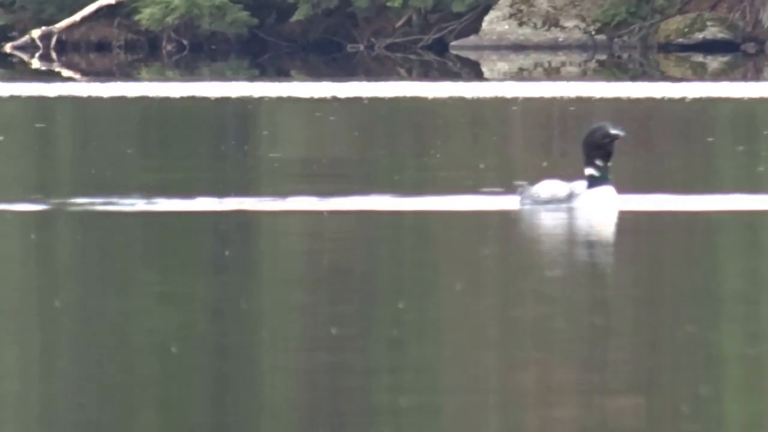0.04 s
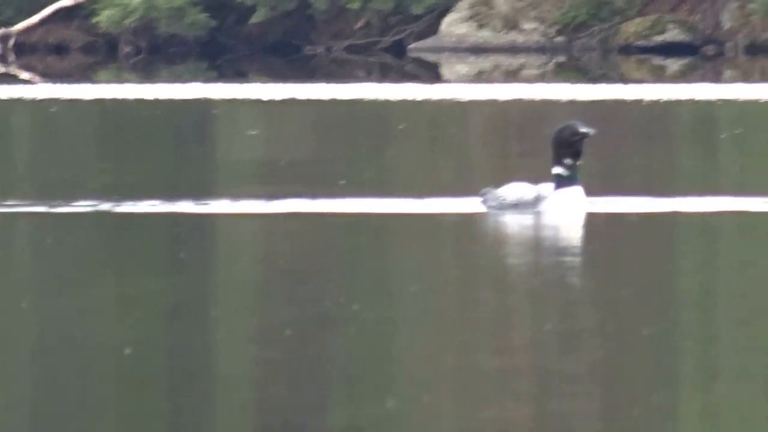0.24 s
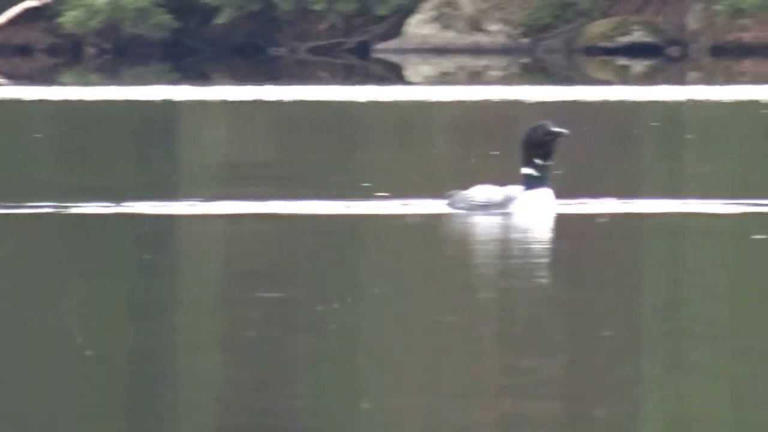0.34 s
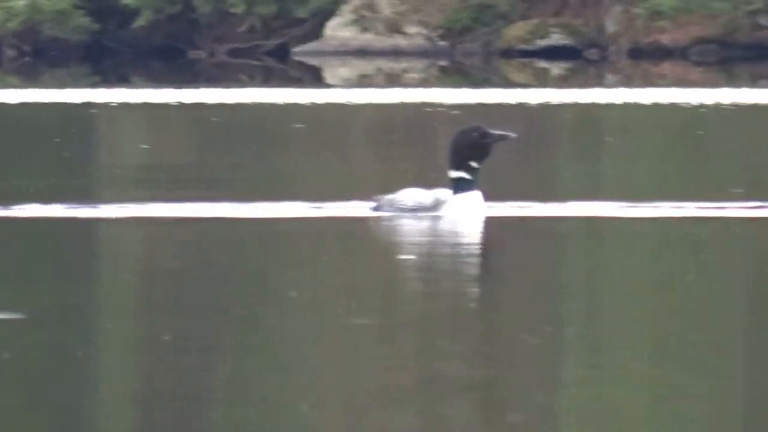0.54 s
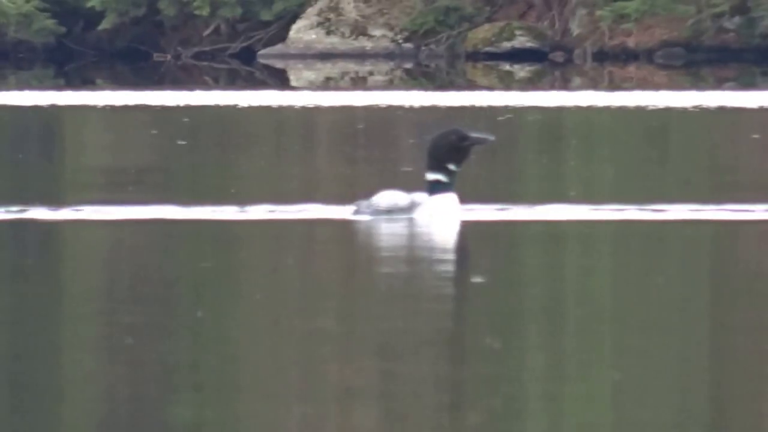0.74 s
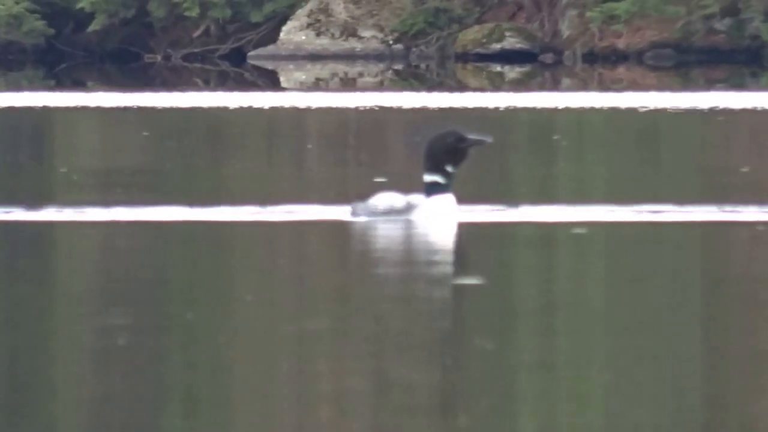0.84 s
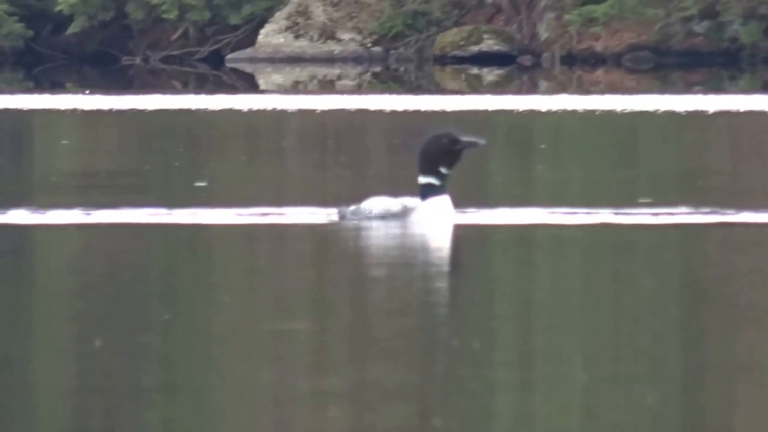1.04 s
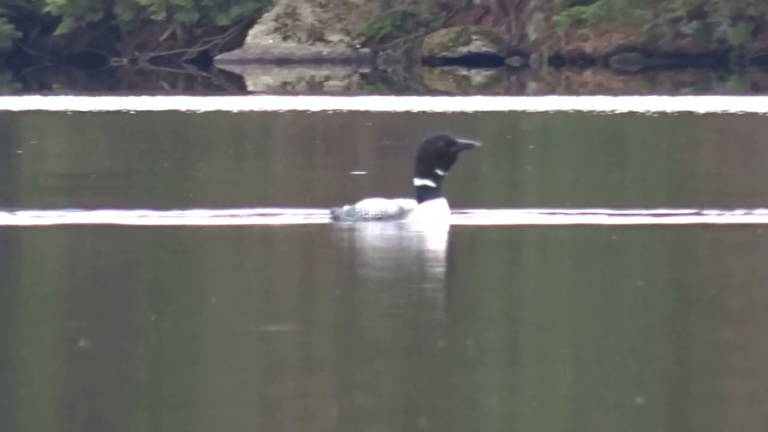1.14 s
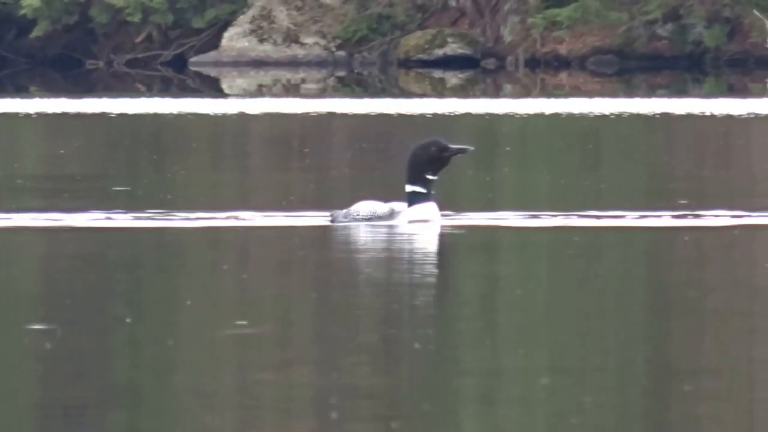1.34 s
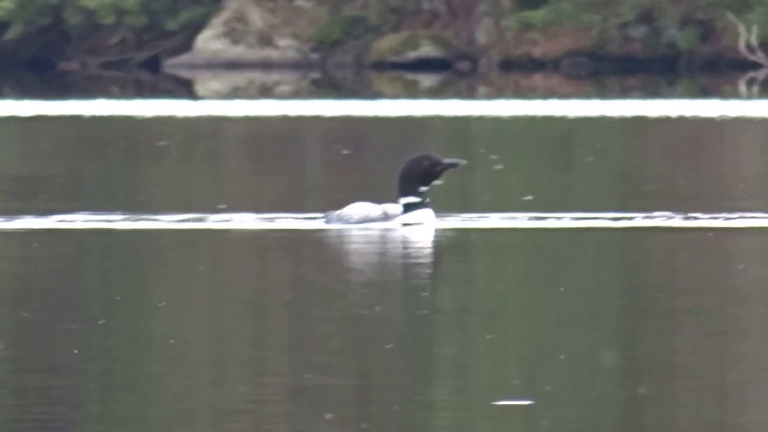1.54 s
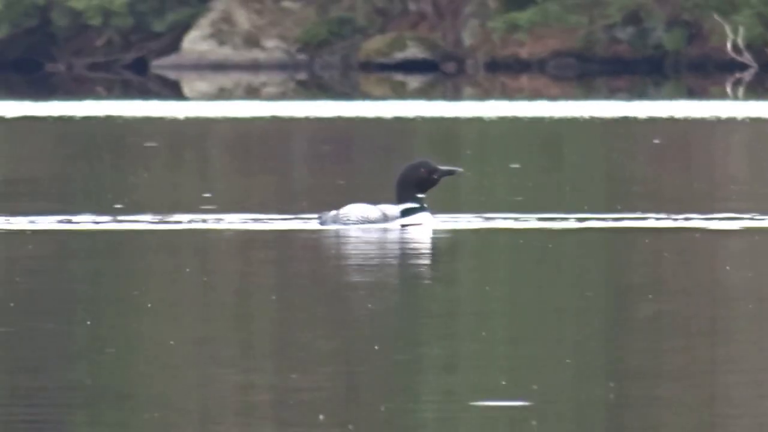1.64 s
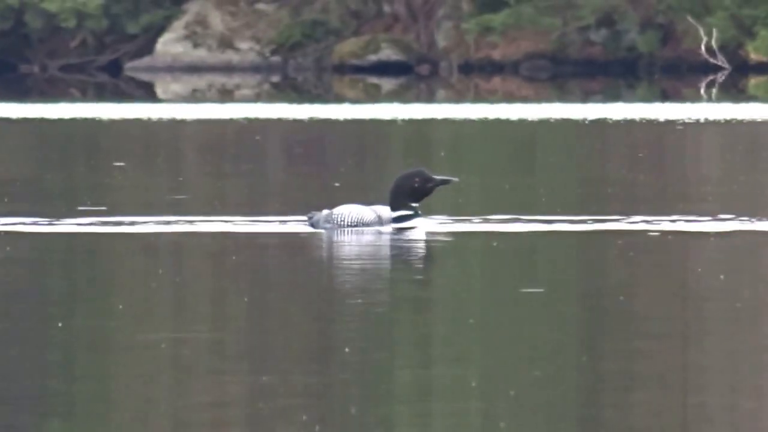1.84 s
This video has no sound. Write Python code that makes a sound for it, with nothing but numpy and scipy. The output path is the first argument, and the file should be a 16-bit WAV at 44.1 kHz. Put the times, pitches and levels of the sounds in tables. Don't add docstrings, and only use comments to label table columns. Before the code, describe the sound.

A loon gives one clear flute-like wail: soft rising lead-in, low note, sudden break to a long arched high note, tiny hiccup. Faint shore echoes follow over quiet lake air, heard through an outdoor microphone with slight hiss.

```python
import sys
import numpy as np
from scipy import signal
from scipy.io import wavfile
from scipy.ndimage import uniform_filter1d

SR = 44100
rng = np.random.default_rng(int(sys.argv[2]) if len(sys.argv) > 2 else 0)


def unload_audio(sound):
    columns = np.transpose(np.atleast_2d(sound))
    steps = np.round(np.clip(columns, -1, 1) * 32767)
    wavfile.write(sys.argv[1], SR, steps.astype(np.int16))


def attenuation_scalar(level_db):
    decades = np.asarray(level_db, float) / 20
    return 10 ** decades


N = 83790

# (t/s, f/Hz, level/dB, bill opening/dB)
LEAD_IN = [
    (0, 337, -50, 9),
    (.056, 366, -42, 4.5),
    (.12, 387.6, -36.5, -2.5),
    (.134, 410, -37, -6.5),
    (.146, 440, -42, 2.5),
    (.183, 529, -57.5, 16.5),
    (.19, 510, -84, 14.5),
]
# (multiple, level/dB, share of bill opening, slope/dB per percent of pitch against the top)
LEAD_IN_MULTIPLES = [(1, -20.5, 1.3, 0.01), (2, 2, 0.034, 0.0), (3, -39.5, 0.94, -0.52)]
# (t/s, f/Hz, level/dB, bill opening/dB)
LOW_NOTE = [
    (.186, 671, -56.5, -4.5),
    (.198, 666.4, -32.5, -5),
    (.24, 676, -30.5, -1.5),
    (.3, 687, -28, -7.5),
    (.36, 695, -25.5, -10),
    (.42, 708.8, -24.5, -8.5),
    (.437, 734, -22.5, -8.5),
    (.446, 743, -25, -17.5),
    (.450, 729.5, -61, -10),
]
# (multiple, level/dB, share of bill opening, slope/dB per percent)
LOW_NOTE_MULTIPLES = [(1, 1, 0.058, 0.003), (2, -24, .1, 0.17), (3, -41, .1, 1.1), (4, -41, 1.3, -1.2),
                      (5, -35.5, 0.49, 1.8)]
# (t/s, f/Hz, level/dB, bill opening/dB)
HIGH_NOTE = [
    (.444, 847, -55, -18),
    (.450, 867, -25.5, -8.5),
    (.54, 876, -24.5, -0.5),
    (.7, 885.9, -24, 1),
    (.82, 895, -23, -2),
    (.97, 892, -23, -4),
    (1.3, 859, -25, -4.5),
    (1.565, 817.6, -30.5, -15),
    (1.586, 800, -55.5, -16.5),
]
# (multiple, level/dB, share of bill opening, slope/dB per percent)
HIGH_NOTE_MULTIPLES = [(1, 1, 0.0, 0.0), (2, -28.5, 0.41, 0.27), (3, -33, 0.32, -0.85),
                       (4, -31.5, 1.7, -0.87), (5, -52, .1, 2), (6, -61, 0.44, 2.5), (7, -56, 0, 1.5),
                       (8, -48.5, 0.37, 3), (11, -55, 0, 1)]
# (t/s, f/Hz, level/dB, bill opening/dB)
HICCUP = [
    (1.575, 647, -76, 0),
    (1.59, 640, -44, 0),
    (1.6, 580, -46.5, 0),
    (1.617, 603, -71, 0),
]
# (multiple, level/dB, share of bill opening, slope/dB per percent)
PLAIN_TONE = [(1, 0.0032, 0.0, 0.013)]
# (delay t/s, spread/s, level/dB)
SHORE_CLUSTERS = [
    (.05, 0.043, -23.5),
    (.24, 0.11, -17.5),
    (.4, 0.03, -25),
    (.75, 0.33, -28.5),
    (1.372, .1, -27),
]
# (f/Hz, level/dB per Hz)
AIR_SPECTRUM = [(28, -17), (50, -10), (130, -6), (300, -7.5), (600, -15.5), (1000, -15), (1900, -24.5),
                (4000, -37.5)]
# (f/Hz, likeness)
AIR_LIKENESS = [(40, 0.9), (125, 1), (300, .86), (1000, 0.58), (3000, 0.74)]
# (t/s, f/Hz, level/dB, bill opening/dB, unused here)
DROPLET = [
    (.413, 7380, -83.5, 0),
    (.419, 6830, -71, 0),
    (.422, 6360, -68, 0),
    (.425, 6050, -64.5, 0),
    (.428, 5900, -88.5, 0),
]
# (t/s, peak level/dB, f/Hz, time to fall 60 dB/s)
TICK_RINGS = [
    (.5046, -41, 10800, .003),
    (.5046, -42, 14000, .0012),
    (1.6806, -51, 10300, .0025),
    (1.6806, -49, 13000, .0022),
    (1.195, -60, 13000, .004),
]
# (t/s, level/dB, length/s, f/Hz)
WIND_PUFFS = [
    (.8, -52.5, 0.017, 51.3),
    (.93, -52.5, 0.021, 44.8),
    (1.125, -45, 0.015, 60),
    (1.24, -36, 0.01, 64.2),
    (1.36, -54, 0.058, 62.3),
    (1.875, -49.5, 0.0088, 88.9),
]

TIME = np.arange(N) / SR
SIDES = np.array([[.5], [-.5]])


def at_hz(points, hz):
    table_hz, values = np.transpose(points)
    return np.interp(np.log(hz), np.log(table_hz), values)


def drift(rate_hz):
    r = np.exp(-80 * np.pi * rate_hz / SR)
    white = rng.standard_normal(N // 40 + 2002)
    slow = signal.lfilter([1], [1, -2 * r, r * r], white)[2000:]
    return np.interp(np.arange(N) / 40, np.arange(len(slow)), slow / slow.std())


def spread(mid, side, alike):
    alike = np.clip(alike, 0, 1)
    return np.sqrt(1 + alike) * mid + np.sqrt(1 - alike) * side * np.array([[1], [-1]])


def pair(alike):
    mid, side = rng.standard_normal((2, N))
    return spread(mid, side, alike) / np.sqrt(2)


def band(x, low_hz, high_hz):
    y = signal.sosfilt(signal.butter(2, [low_hz, high_hz], "band", fs=SR, output="sos"), x)
    return y / y.std()


def highpass(x, hz):
    return signal.sosfilt(signal.butter(4, hz, "high", fs=SR, output="sos"), x)


def note(rows, multiples, bloom_db=0):
    wobble_share, shimmer_db, flicker_db = .0008, 0.83, 0.31
    bloom_s, ease_s = 0.17, 0.0053
    s, hz, db, bill_db = np.transpose(rows)
    pitch, level, bill = (np.interp(TIME, s, column) for column in (hz, db, bill_db))
    phase = 2 * np.pi * np.cumsum(pitch * (1 + wobble_share * drift(27))) / SR
    late = bloom_db * np.exp(-np.clip(TIME - s[0], 0, None) / bloom_s)
    under_top = 100 * (pitch / hz.max() - 1)
    voice = 0
    for k, multiple_db, share, slope in multiples:
        colour_db = multiple_db + share * bill + slope * under_top + (k - 1) * late
        unsteady_db = (shimmer_db + flicker_db * (k - 3)) * drift(18)
        voice = voice + attenuation_scalar(colour_db + unsteady_db) * np.sin(round(k) * phase)
    sounding = (TIME >= s[0]) * (TIME <= s[-1])
    strength = uniform_filter1d(attenuation_scalar(level) * sounding, int(ease_s * SR))
    return np.sqrt(2) * strength * voice


def wail():
    low = note(LEAD_IN, LEAD_IN_MULTIPLES) + note(LOW_NOTE, LOW_NOTE_MULTIPLES)
    return low + note(HIGH_NOTE, HIGH_NOTE_MULTIPLES, bloom_db=-2) + note(HICCUP, PLAIN_TONE)


def place_bird(call):
    split = signal.butter(4, 1300, "high", fs=SR, output="sos")
    overtones = signal.sosfiltfilt(split, call)
    return (call - overtones) * attenuation_scalar(-.75 * SIDES) + overtones * attenuation_scalar(-3 * SIDES)


def rasp(call):
    strength = np.sqrt(uniform_filter1d(call ** 2, size=2000).clip(0))
    return attenuation_scalar(-45 + 2.5 * drift(12)) * strength * band(pair(.9), 1000, 1520)


def air():
    out, edges = 0, 22 * 2 ** np.arange(0, 8.6, .5)
    white = rng.standard_normal((2, 2, N))
    for k, (low, high) in enumerate(zip(edges, edges[1:])):
        sos = signal.butter(2, [low, high], "band", fs=SR, output="sos")
        mid, side = signal.sosfilt(sos, white[k % 2])
        hz = np.sqrt(low * high)
        level = attenuation_scalar(at_hz(AIR_SPECTRUM, hz) + 0.52 * drift(3))
        out = out + level * spread(mid, side, at_hz(AIR_LIKENESS, hz))
    return attenuation_scalar(-55) * out / out.std()


def drone():
    centre_hz, width_hz = 63.4, 12
    return attenuation_scalar(-67.5) * band(pair(0.94), centre_hz - width_hz / 2, centre_hz + width_hz / 2)


def lapping():
    return attenuation_scalar(-74 + 2 * drift(6)) * band(pair(.85), 1080, 1410)


def hiss():
    resonance_hz, whine_hz = 6540, 15625
    white = pair(1)
    lift = attenuation_scalar(-85.5) * band(white, .8 * resonance_hz, 1.2 * resonance_hz)
    even = attenuation_scalar(-68) * white + lift
    return even * attenuation_scalar(-.3 * SIDES) + attenuation_scalar(-84) * np.sin(2 * np.pi * whine_hz * TIME)


def shores(call):
    power = 0
    for s, width, db in SHORE_CLUSTERS:
        bell = np.exp(-.5 * ((TIME - s) / width) ** 2) / (width * SR * np.sqrt(2 * np.pi))
        power = power + attenuation_scalar(2 * db) * bell
    dull = signal.sosfilt(signal.butter(1, 1200, fs=SR, output="sos"), call)
    thin = 2 * highpass(dull, 840)
    return signal.fftconvolve(np.sqrt(power) * pair(0.96), thin[None], axes=1)[:, :N]


def droplet():
    return note(DROPLET, PLAIN_TONE) * attenuation_scalar(-4 * SIDES)


def ticks():
    rings = 0
    for s, db, hz, t60 in TICK_RINGS:
        fade = attenuation_scalar(db - 60 * np.clip(TIME - s, 0, 1) / t60)
        rings = rings + (TIME > s) * fade * np.sin(2 * np.pi * hz * (TIME - s))
    return highpass(rings + 1e-18, 8000) * attenuation_scalar(-2.2 * SIDES)


def wind():
    out = 0
    for s, db, length, hz in WIND_PUFFS:
        swings = np.sin(2 * np.pi * hz * (TIME - s))
        lumps = .35 * band(pair(.95), 0.7 * hz, 2.8 * hz)
        out = out + attenuation_scalar(db) * (swings + lumps) * np.exp(-.5 * ((TIME - s) / length) ** 2)
    return out


def scene():
    call = wail()
    bird = place_bird(call) + rasp(call) + shores(call)
    background = air() + drone() + lapping() + hiss()
    return bird + background + droplet() + ticks() + wind()


def top_cut(x):
    return signal.sosfilt(signal.butter(12, 15730, fs=SR, output="sos"), x)


def record(dry):
    cut = signal.ellip(12, .5, 45, 15690, fs=SR, output="sos")
    mix = signal.sosfilt(cut, dry)
    return top_cut(mix)


dry = scene()
out = record(dry)
unload_audio(out)
```